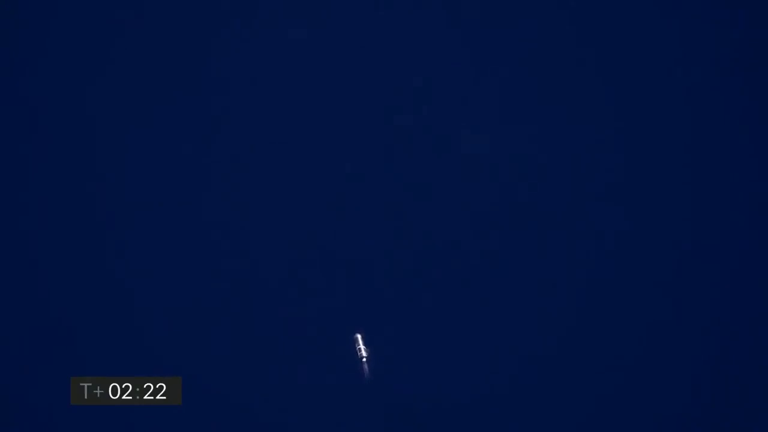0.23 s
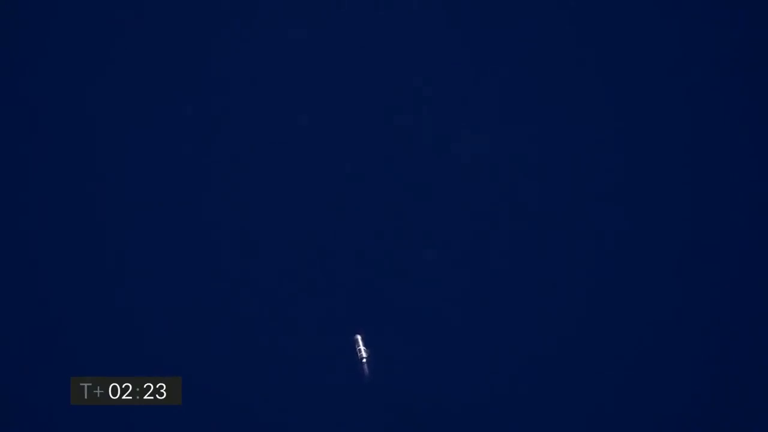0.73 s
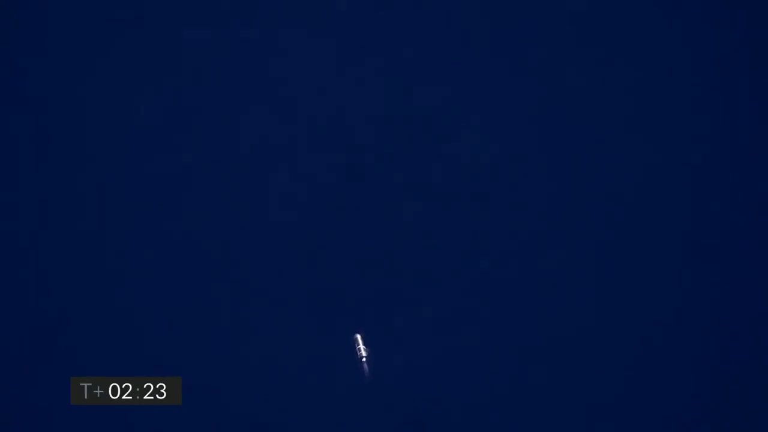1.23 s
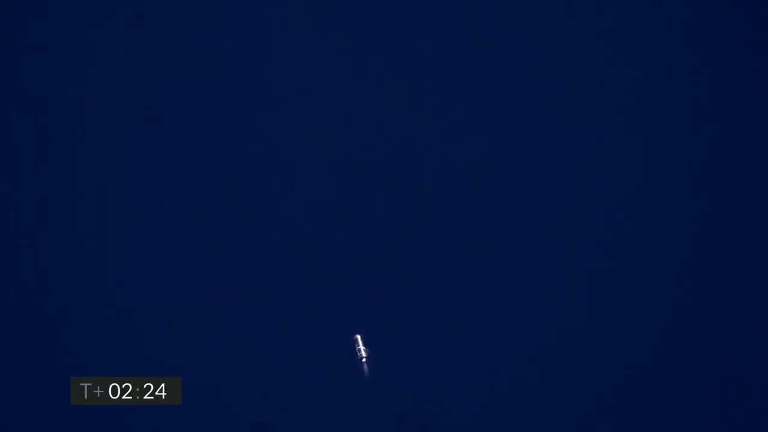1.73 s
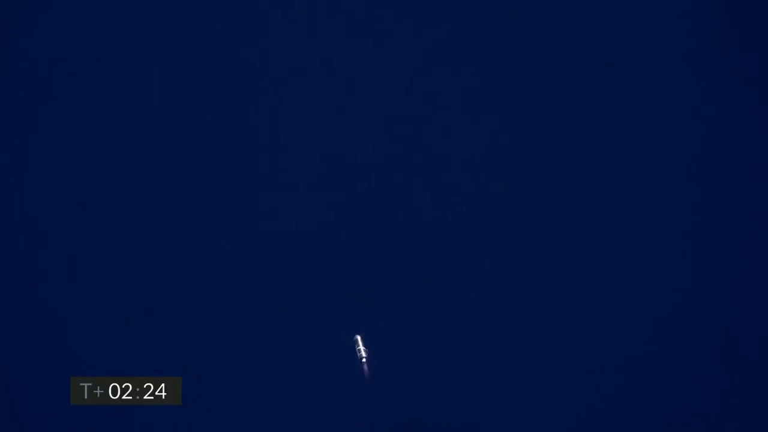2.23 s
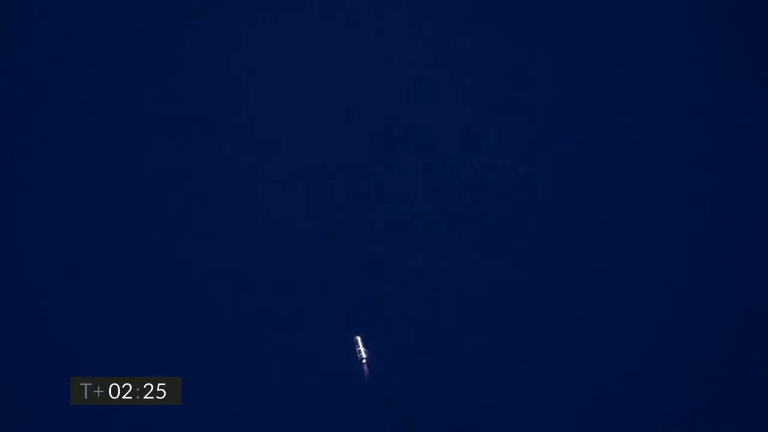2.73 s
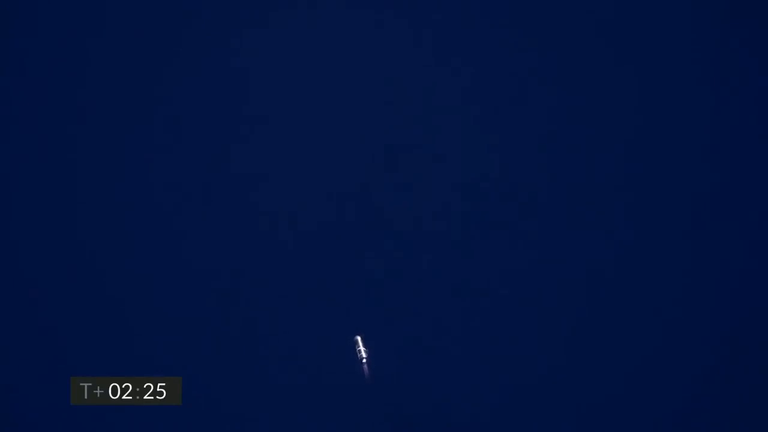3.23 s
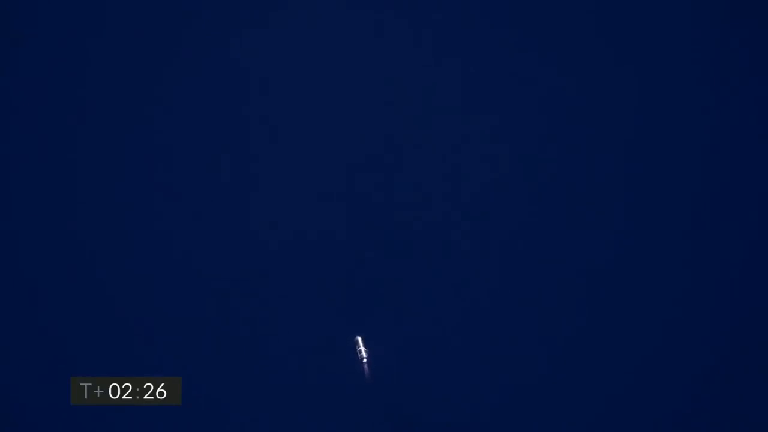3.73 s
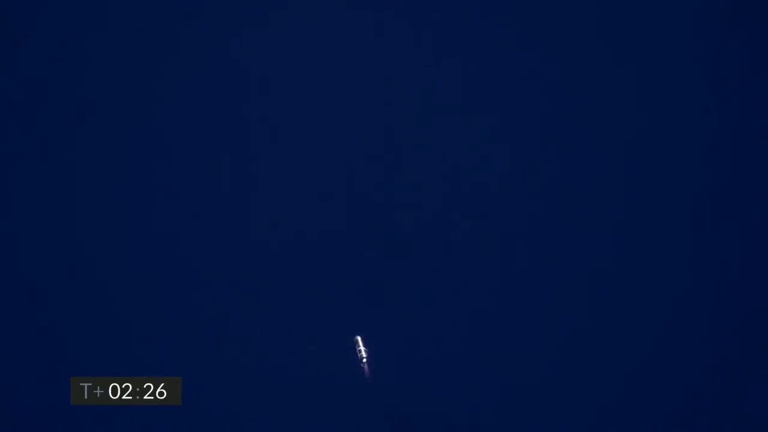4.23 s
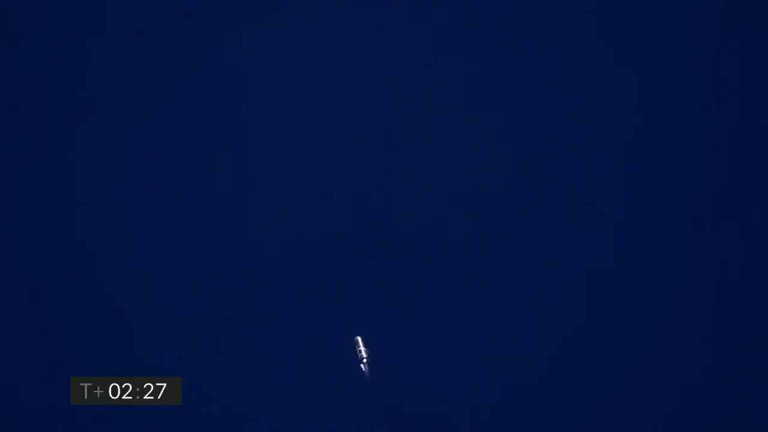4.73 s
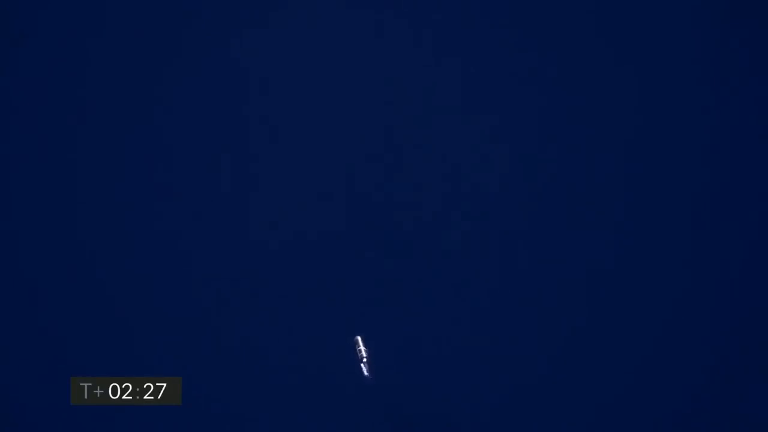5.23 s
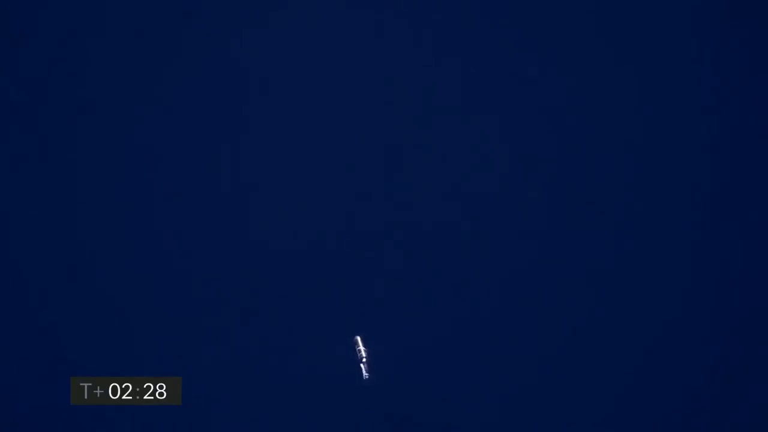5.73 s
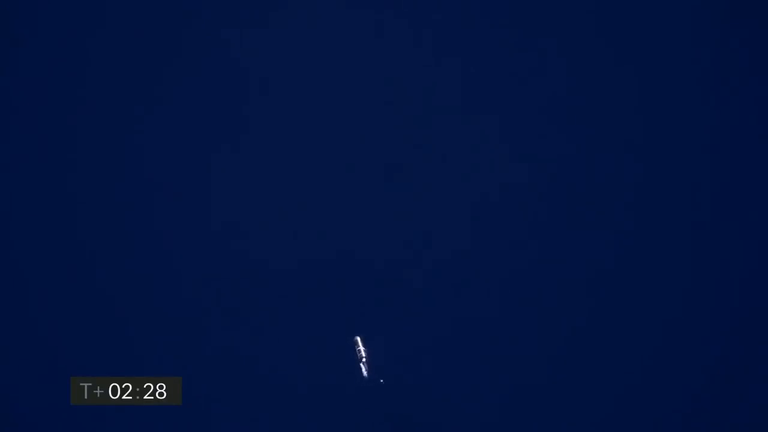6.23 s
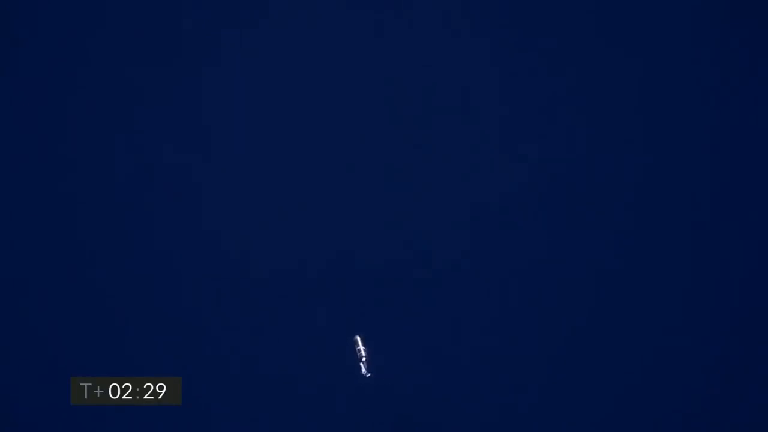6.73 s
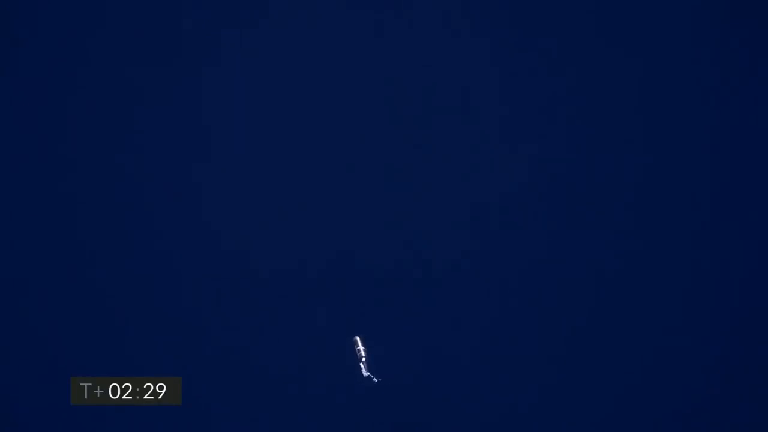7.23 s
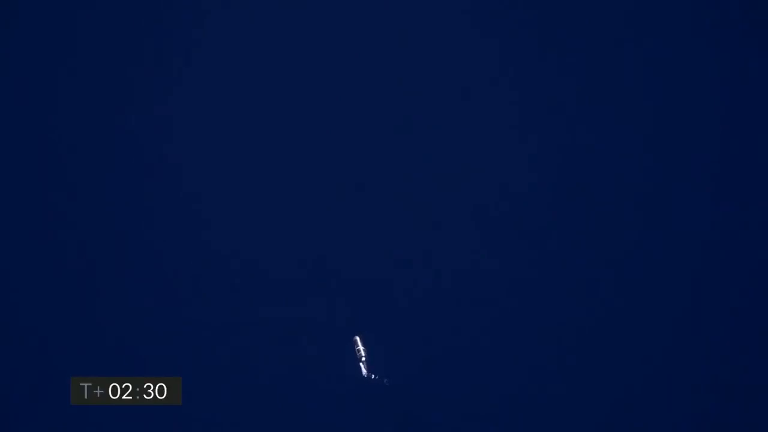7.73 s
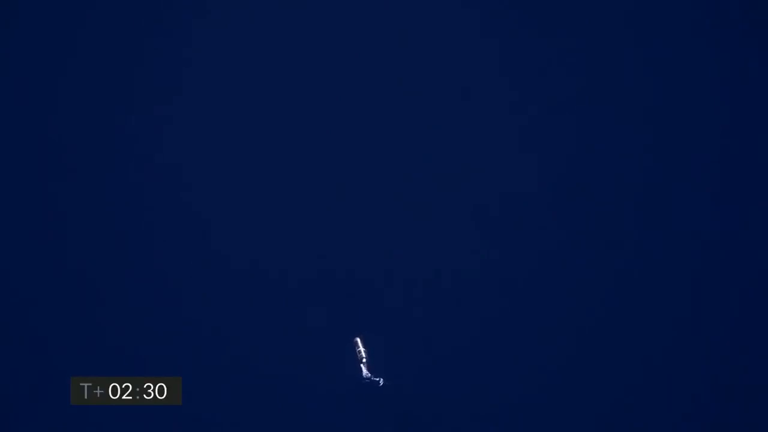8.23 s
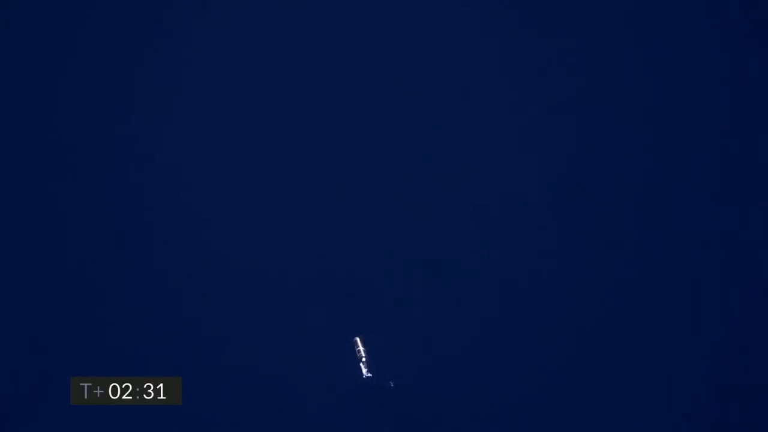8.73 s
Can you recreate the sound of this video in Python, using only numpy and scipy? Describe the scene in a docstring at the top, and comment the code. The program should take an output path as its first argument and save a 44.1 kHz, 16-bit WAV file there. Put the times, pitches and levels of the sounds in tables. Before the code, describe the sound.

A far-off rocket high overhead rumbles and crackles steadily, fading up early, while low wind gusts thump the microphone over a faint whining fan hiss.

```python
"""A rocket climbs high overhead: large eddies of its plume rumble and boom, synthesized as coloured noise.
Its shock fronts, random impulses dulled by miles of air, form a crackling roar with volleys and single cracks.
Resonant surroundings ring with these sounds. Gusts buffet the outdoor microphone as low noise with slow swings,
and a small fan close by adds faint sine tones and hiss. The whole sound is faded up early on."""
import sys
import numpy as np
from scipy import signal
from scipy.fft import rfft, irfft
from scipy.io import wavfile
from scipy.ndimage import uniform_filter1d

SR = 44100
rng = np.random.default_rng(int(sys.argv[2]) if len(sys.argv) > 2 else 0)


def wav_out(sig):
    """Save sig, one row per channel (or a flat mono array), as 16-bit PCM at SR to the path in sys.argv[1]."""
    wavfile.write(sys.argv[1], SR, np.round(np.clip(np.atleast_2d(sig).T, -1, 1) * 32767).astype(np.int16))


N = 396900  # length in samples

# All source levels are before the fader; spectra in dB per Hz give relative power density.

# Tones of the fan. Each row: frequency in Hz, level in dB relative to FAN_DB.
FAN_TONES = [(1718, -12.5), (1779, -1.5), (2625, -20.5), (2668, -18), (3368, -20.5), (3615, -19),
             (3680, -20), (3791, -12), (3850, -16), (4295, -21.5), (4330, -22), (4412, -19.5), (4435, -20),
             (4472, -17.5), (4525, -18.5), (4587, -20), (4646, -20), (4798, -19.5), (4857, -21),
             (5068, -21.5), (6874, -29.5)]
# Spectrum of the fan's moving air. Each row: frequency in Hz, density in dB per Hz.
HISS_SPECTRUM = [(200, 6), (1300, 2), (1850, 0), (1980, -3), (2150, 0.5), (3000, -6), (3500, -7),
                 (3800, -5.5), (4120, -10.5), (4550, -9.5), (5700, -13), (6650, -20.5), (7650, -21),
                 (8200, -30), (9200, -22), (9600, -21), (11000, -28), (15500, -36)]
# Course of the hiss. Each row: time in seconds, level in dB.
HISS_LEVELS = [(0.8, -53.5), (1.25, -54), (1.8, -54.5), (2.1, -54), (3.7, -54), (3.92, -52.5),
               (4.15, -54.5), (4.42, -53), (4.65, -53), (4.95, -54.5), (5.7, -54.5), (5.9, -53.3),
               (6.2, -54), (7.4, -54), (8.3, -54), (8.9, -54)]
FAN_DB = -63  # reference level of the tones
FINE_TONE_HZ, FINE_TONE_DB = 17, 1.5  # weaker tones in the hiss: spacing and typical lift

# Breeze on the microphone. Each row: time in seconds, level in dB.
BREEZE_LEVELS = [(0.3, -37), (1.8, -38), (2.6, -33.5), (3.7, -34.5), (5.0, -33.5), (6.15, -37.5),
                 (7.2, -34), (8.0, -30)]
# Gusts, each one heave of air. Each row: start in seconds, length in seconds, level in dB.
GUST_EVENTS = [(0.695, 0.13, -24), (1.048, 0.18, -25), (2.305, 0.27, -29), (2.598, 0.12, -20.5),
               (2.895, 0.19, -27.5), (4.69, 0.38, -32.5), (5.255, 0.13, -22.5), (5.374, .17, -14.5),
               (5.56, 0.13, -22), (5.843, 0.15, -26.5), (6.32, 0.18, -24.5), (8.06, 0.17, -26.5),
               (8.201, 0.16, -12), (8.34, .36, -20.5), (8.648, 0.18, -14.5), (8.842, .11, -13.5),
               (8.9, .2, -8.5)]
# Spectrum of the wind's flutter. Each row: frequency in Hz, density in dB per Hz.
FLUTTER_SPECTRUM = [(8, -41), (18, 6.5), (28, -6), (50, -11.5), (100, -22.5), (200, -32), (500, -54),
                    (8000, -150)]
GUST_ATTACK_S, GUST_RELEASE_S = 0.048, 0.074

# Resonances of the surroundings. Each row: centre in Hz, half width in Hz, lift at the start in dB,
# lift at the end in dB.
RESONANCES = [(58.6, 20.3, 21, 11), (98.1, 14.4, 21, 21), (151.1, 17.9, 16.5, 19.5),
              (184.46, 19.7, 18.5, 17.5), (231.5, 23, 6, 7.5), (309.7, 9.6, 10.5, 10.5),
              (354.4, 14.3, 12.5, 14.5), (401.3, 19, 10.5, 9), (449, 20, -2, 4.5), (485, 16.4, 11, 8.5),
              (534.4, 10.5, 11, 6.5), (586.4, 10, 5.5, 4), (635.4, 12, 5.5, 7), (721, 18, 7, 6.5),
              (746, 12, 10, 1), (784, 20, 4, 9.5), (850.2, 19, 13, 9), (904, 12, 1.5, 4), (962, 19, 4, 8),
              (1028, 24, 9.5, 7), (1136.6, 21, 10.5, 6.5), (1200, 12, 3, 1.5), (1280, 23, -2, 4),
              (1400, 20, 9, 9), (1670, 27, 4, 4)]
# Plume spectrum after the long path through air. Each row: frequency in Hz, density in dB per Hz.
FAR_AIR_SPECTRUM = [(30, -4.5), (130, -15), (300, -8.5), (500, -12), (650, -25), (900, -29.5), (1200, -37),
                    (1420, -46), (1700, -51), (2400, -59), (5000, -100)]

# Single steep shocks. Each row: start in seconds, peak in dB, edge (low-pass cutoff) in Hz;
# the steeper the front, the higher its edge.
CRACK_EVENTS = [(0.128, -13, 1100), (0.137, -19, 900), (0.181, -25, 1400), (0.187, -24, 1100),
                (0.233, -17, 900), (0.294, -21, 1210), (0.391, -13, 700), (0.401, -12, 800),
                (1.241, -12.5, 900), (1.262, -16.5, 398), (1.321, -17, 1300), (1.353, -15, 1000),
                (1.377, -18, 1300), (1.818, -18, 1180), (2.055, -21, 1200), (2.089, -28, 700),
                (2.158, -27, 900), (2.286, -19, 850), (2.36, -26, 597), (2.382, -26, 750),
                (2.462, -21, 1000), (2.507, -23, 800), (2.527, -13, 1000), (2.539, -22.5, 704),
                (2.726, -21.5, 1000), (2.953, -18.5, 600), (3.213, -18.5, 450), (3.353, -19, 700),
                (4.091, -19, 650), (4.425, -23, 656), (4.476, -18, 750), (5.341, -22.5, 700),
                (5.382, -15.5, 600), (5.729, -21, 700), (5.948, -16.5, 1590), (6.05, -18, 800),
                (6.075, -20, 700), (6.611, -26, 1700), (7.263, -19, 447), (7.449, -16, 550),
                (7.716, -19, 950), (8.030, -25, 950), (8.279, -15.5, 596), (8.341, -15.5, 1150),
                (8.505, -16.5, 500), (8.523, -18, 1400), (8.789, -17.5, 700)]
# Spectrum of a crack ahead of its edge filter. Each row: frequency in Hz, density in dB per Hz.
CRACK_SPECTRUM = [(30, -18), (120, 3), (400, 6.5), (650, -1.5), (1100, -6.5), (1850, -24.5), (2300, -25.5),
                  (5000, -50)]
# A crack comes mostly straight from the sky: share of the resonances' dB lift, length kept in seconds.
CRACK_RING_SHARE, CRACK_TAIL_S = 0.65, 0.1

# Volleys of strong shocks. Each row: start in seconds, length in seconds (before half a release is added),
# level in dB before VOLLEY_MAKEUP_DB and the shocks' colour.
VOLLEY_EVENTS = [(0.1, 0.035, -26.5), (0.162, .026, -29.5), (0.208, .025, -32), (0.269, 0.025, -26.5),
                 (0.367, 0.033, -33), (0.612, 0.019, -37), (0.686, 0.022, -36.5), (0.887, .022, -30),
                 (1.07, 0.017, -33.5), (1.222, 0.03, -31.5), (1.302, .026, -29.5), (1.338, 0.042, -31),
                 (1.785, .035, -36.5), (2.038, 0.033, -36.5), (2.28, 0.021, -40), (2.445, .025, -35),
                 (2.504, .04, -34), (2.715, 0.025, -38), (2.942, 0.026, -39), (3.05, 0.027, -39.5),
                 (3.317, .02, -37), (3.917, .028, -37), (4.452, .03, -37.5), (4.627, 0.019, -39),
                 (4.838, 0.027, -38.5), (5.286, 0.02, -37), (5.37, 0.025, -36), (5.503, 0.017, -43),
                 (5.92, .04, -38.5), (6.04, .04, -36.5), (6.585, 0.072, -38), (7.419, 0.036, -37.5),
                 (7.695, .03, -41), (7.967, .06, -38), (8.164, .014, -42), (8.255, .028, -44),
                 (8.317, .04, -28), (8.505, .03, -40), (8.563, 0.027, -39), (8.768, 0.019, -44)]
# Strong shocks stay steeper and keep more treble. Each row: frequency in Hz, density in dB per Hz.
SHOCK_SPECTRUM = [(30, -23), (150, -2.5), (500, 8), (700, 0.5), (1200, -6), (1850, -13), (2300, -27.5),
                  (5000, -59.5)]
VOLLEY_ATTACK_S, VOLLEY_RELEASE_S = 0.0086, 0.01403
VOLLEY_MAKEUP_DB = 34.5  # makes up for the loss through the shocks' colour

# Booms of single large eddies. Each row: start in seconds, length in seconds, level in dB, pitch in Hz.
BOOM_EVENTS = [(0.167, 0.11, -25.5, 62), (1.204, 0.11, -23.5, 161), (1.22, 0.15, -31, 65),
               (2.217, 0.59, -32.5, 188.6), (3.058, 0.086, -28, 95), (3.298, 0.12, -25.5, 64.6),
               (3.567, 0.15, -29, 186), (4.036, 0.11, -19.5, 95), (4.436, 0.1, -21.5, 96),
               (4.742, 0.063, -29.5, 345), (5.307, 0.15, -19.5, 60.4), (5.368, 0.086, -22, 143),
               (5.327, 0.25, -34, 247), (5.346, 0.22, -25, 101), (5.946, 0.086, -25, 97),
               (6.033, 0.13, -18.5, 98), (6.697, 0.082, -25, 100), (7.62, 0.073, -25, 183),
               (8.312, 0.064, -30.5, 161), (8.475, 0.35, -34.5, 342), (8.54, 0.062, -24, 154),
               (8.877, 0.23, -32, 110)]
BOOM_ATTACK_S, BOOM_RELEASE_S, BOOM_OCTAVES = 0.027, 0.058, 0.5  # last: bandwidth in octaves

# Slow swells of the plume. Each row: time in seconds, roar level in dB before ROAR_TRIM_DB,
# crackle level in dB; both before the flicker.
PLUME_LEVELS = [(0.05, -31, -48), (0.13, -30, -45), (0.25, -30.5, -43.5), (0.55, -30, -41),
                (0.8, -30.5, -42.5), (1.0, -28.5, -40), (1.13, -32, -44.5), (1.22, -31.5, -40),
                (1.38, -31.5, -43), (1.47, -31, -44.5), (1.75, -32, -43), (1.95, -35, -43.5),
                (2.07, -30.5, -43.5), (2.22, -34.5, -44), (2.5, -31.5, -43), (2.85, -32, -48),
                (3.2, -33.5, -47.5), (3.35, -29.5, -47.5), (3.5, -32.5, -51.5), (3.65, -30.5, -47.5),
                (3.85, -32.5, -50), (4.2, -31.5, -45.5), (4.33, -32.5, -48), (4.45, -29.5, -47.5),
                (4.6, -36, -52.5), (4.8, -31.5, -47.5), (5.08, -35.5, -48.5), (5.4, -31, -46),
                (5.8, -35, -46), (6.03, -32.5, -46.5), (6.25, -35, -50), (6.6, -32.5, -46.5),
                (7.15, -33.5, -52), (7.5, -30.5, -46), (7.85, -33.5, -48), (8.0, -31, -49.5),
                (8.15, -32, -47), (8.6, -32, -46.5), (8.87, -34.5, -46.5), (8.98, -28.5, -48.5)]
# Slow swells of the rumble under the roar. Each row: time in seconds, level in dB before the flicker.
RUMBLE_LEVELS = [(0.2, -27), (0.6, -33), (1.0, -31.5), (1.5, -32), (1.95, -33.5), (2.3, -32), (2.9, -33.5),
                 (3.8, -32), (4.42, -34.5), (4.7, -34), (5.1, -34.5), (5.45, -33), (5.8, -34.5),
                 (6.05, -32.5), (6.25, -37.5), (6.5, -32.5), (6.9, -34.5), (7.15, -36), (7.45, -33.5),
                 (8.0, -31.5), (8.25, -34), (8.6, -33.5)]
DEEP_DB, BOOM_BAND_DB = -32, -32  # the two lowest bands hold a steady level
ROAR_TRIM_DB = -1.0
# Turbulent air makes the sound flicker: random levels per second, rms depths in dB.
FLICKER_PER_S, ROAR_FLICKER_DB, CRACKLE_FLICKER_DB = 28, 0.78, 1.35

# Fader that brings the whole sound up. Each row: time in seconds, gain in dB.
FADER_GAINS = [(0.85, -8.5), (1.4, -2), (1.9, 0.1), (2.4, 1.5)]
TOP_HZ = 15700  # upper edge of the output


def undb(db):
    """Amplitude gain is ten to the power of the decibels over twenty."""
    return 10 ** (np.asarray(db) / 20)


def unit(x):
    """Normalization divides a signal by its rms."""
    return x / np.sqrt(np.mean(x ** 2))


def curves(table):
    """Linear interpolation carries each column after the time to every sample."""
    seconds, *columns = np.transpose(table)
    return [np.interp(np.arange(N) / SR, seconds, column) for column in columns]


def bins():
    """Frequencies in Hz of a full-length spectrum, kept at 1 Hz or more."""
    return np.maximum(np.arange(N // 2 + 1) * SR / N, 1)


def slope(points):
    """A spectrum in dB is interpolated over logarithmic frequency."""
    hz, db = np.transpose(points)
    return np.interp(np.log(bins()), np.log(hz), db)


def colour(x, db):
    """Minimum phase: folding the cepstrum makes the filter causal, so resonances ring on afterwards."""
    cepstrum = irfft(np.log(undb(db)), N)
    cepstrum[1:N // 2] *= 2
    cepstrum[N // 2 + 1:] = 0
    response = np.exp(rfft(cepstrum))
    return irfft(rfft(x) * response, N)


def band(x, low_hz, high_hz, order=8):
    """Butterworth magnitudes confine a sound to a band without shifting its phase."""
    f = bins()
    low_side = 1 + (low_hz / f) ** (2 * order)
    high_side = 1 + (f / high_hz) ** (2 * order)
    return irfft(rfft(x) / np.sqrt(low_side * high_side), N)


def walk(rate):
    """Random fluctuation: levels held 1 / rate seconds, smoothed by two moving averages to an rms of one."""
    hold = int(SR / rate)
    held = np.repeat(rng.standard_normal(N // hold + 1), hold)
    smoothed = uniform_filter1d(uniform_filter1d(held, hold), hold)
    return unit(smoothed[:N])


def steady(x, seconds):
    """Dividing by a running rms evens out slow swings and keeps the quick grain."""
    power = uniform_filter1d(x ** 2, int(seconds * SR))
    return x / np.sqrt(power + 1e-18)


def swell(t, length_s, attack_s, release_s):
    """A linear envelope rises from t = 0, holds and dies away."""
    rise = t / attack_s
    fall = (length_s - t) / release_s
    return np.clip(np.minimum(rise, fall), 0, 1)


def fan():
    """Rotation: tones waver together with the motor's speed and flicker singly, over the hiss of moving air."""
    turning = np.cumsum(1 + 0.0003 * walk(rate=9)) / SR
    whine = np.zeros(N)
    for hz, db in FAN_TONES:
        level = undb(db + 1.0 * walk(rate=4))
        phase = 2 * np.pi * (hz * turning + rng.random())
        whine += level * np.sqrt(2) * np.sin(phase)

    # random narrow peaks make the hiss ring faintly
    peaks = rng.exponential(size=SR // 8)
    fine = np.interp(bins() / FINE_TONE_HZ, np.arange(SR // 8), peaks)
    hiss_db, = curves(HISS_LEVELS)
    spectrum = slope(HISS_SPECTRUM) + FINE_TONE_DB * np.minimum(fine, 4)
    air = unit(colour(rng.standard_normal(N), spectrum))
    return whine * undb(FAN_DB) + air * undb(hiss_db + 0.55 * walk(rate=47))


def wind():
    """Wind pressure: breeze and gusts flutter on the microphone along with slow, heavy swings."""
    breeze_db, = curves(BREEZE_LEVELS)
    t = np.arange(N) / SR
    gusts = np.zeros(N)
    for start_s, length_s, db in GUST_EVENTS:
        gusts += undb(db) * swell(t - start_s, length_s, GUST_ATTACK_S, GUST_RELEASE_S)
    force = np.hypot(undb(breeze_db), gusts)
    flutter = steady(colour(rng.standard_normal(N), slope(FLUTTER_SPECTRUM)), seconds=0.072)
    swings = steady(band(rng.standard_normal(N), low_hz=2.0, high_hz=8.6, order=3), seconds=0.21)
    # the swings grow more slowly with the force than the flutter does
    return flutter * force + swings * undb(-4.0) * force ** 0.52


def surroundings():
    """Resonance: Gaussian peaks add up in dB to one lift curve for the start and one for the end."""
    f = bins()
    shapes = np.array([np.exp(-((f - hz) / width) ** 2) for hz, width, _, _ in RESONANCES])
    lifts = np.array(RESONANCES)[:, 2:]
    return lifts.T @ shapes


def resound(x, points, rings):
    """Reverberant colouring: resonances shift in strength, by a crossfade, as the rocket moves on."""
    early, late = (colour(x, slope(points) + lift) for lift in rings)
    return early + (late - early) * np.arange(N) / N


def shocks(rate, spread_db):
    """Random arrivals: shock fronts at rate per second, many weak and a few strong."""
    arrives = rng.random(N) < rate / SR
    strength_db = spread_db * np.minimum(rng.standard_normal(N), 2)
    train = arrives * undb(strength_db)
    return unit(train - train.mean())


def cracks(rings):
    """Impulse response: each lone steep shock is a brief snap with a faint ring after it."""
    spectrum = slope(CRACK_SPECTRUM) + CRACK_RING_SHARE * rings
    front = colour(signal.unit_impulse(N), spectrum)[:int(CRACK_TAIL_S * SR)]
    out = np.zeros(N + len(front))
    for start_s, db, edge_hz in CRACK_EVENTS:
        edge = signal.butter(2, edge_hz, fs=SR, output="sos")
        snap = signal.sosfilt(edge, front)
        start = int(start_s * SR)
        # inverted polarity
        out[start:start + len(snap)] -= undb(db) * snap / np.abs(snap).max()
    return out[:N]


def volleys(rings, count=36):
    """Superposition: each volley is a dense tumble of uneven shocks that swells and dies away."""
    train = np.zeros(N)
    for start_s, length_s, db in VOLLEY_EVENTS:
        whole_s = length_s + VOLLEY_RELEASE_S / 2
        lag = (np.arange(count) + rng.random(count)) / count * whole_s
        envelope = swell(lag, whole_s, VOLLEY_ATTACK_S, VOLLEY_RELEASE_S)
        strength = rng.standard_normal(count) * envelope
        arrival = ((start_s + lag) * SR).astype(int)
        np.add.at(train, arrival, undb(db) * strength / np.linalg.norm(strength))
    return undb(VOLLEY_MAKEUP_DB) * resound(train, SHOCK_SPECTRUM, rings)


def booms(eddies):
    """Eddy scale: now and then one large eddy swells out as a narrow band; larger ones sound lower."""
    out = np.zeros(N)
    edge = 2 ** (BOOM_OCTAVES / 2)
    for start_s, length_s, db, hz in BOOM_EVENTS:
        span = np.arange(int(start_s * SR), min(int((start_s + length_s) * SR), N))
        passband = signal.butter(3, [hz / edge, hz * edge], "band", fs=SR, output="sos")
        # start early so that the filter has settled
        lead_in = max(span[0] - SR // 4, 0)
        eddy = signal.sosfilt(passband, eddies[lead_in:span[-1] + 1])[-len(span):]
        envelope = swell(span / SR - start_s, length_s, BOOM_ATTACK_S, BOOM_RELEASE_S)
        out[span] += unit(eddy) * undb(db) * envelope
    return out


def plume(rings):
    """Jet noise: turbulence and dense shocks ring the surroundings; shocks dominate the higher bands."""
    roar_db, crackle_db = curves(PLUME_LEVELS)
    rumble_db, = curves(RUMBLE_LEVELS)
    flicker = walk(rate=FLICKER_PER_S)
    eddies = resound(rng.standard_normal(N), FAR_AIR_SPECTRUM, rings)
    uneven_shocks = shocks(rate=1100, spread_db=4) * undb(walk(rate=60))
    fronts = resound(uneven_shocks, FAR_AIR_SPECTRUM, rings)

    deep = steady(band(eddies, low_hz=41, high_hz=69), seconds=0.29)
    boom = steady(band(eddies, low_hz=88, high_hz=121.0), seconds=0.19)
    rumble_mix = eddies + undb(-5.5) * fronts
    rumble = steady(band(rumble_mix, low_hz=118.0, high_hz=257), seconds=0.14)
    roar_mix = fronts + undb(-7.5) * eddies
    roar = steady(band(roar_mix, low_hz=253.0, high_hz=628), seconds=0.11)
    crackle = steady(band(fronts, low_hz=618, high_hz=5000), seconds=0.13)

    lowest = deep * undb(DEEP_DB) + boom * undb(BOOM_BAND_DB)
    middle = rumble * undb(rumble_db) + roar * undb(roar_db + ROAR_TRIM_DB)
    flickering_middle = middle * undb(ROAR_FLICKER_DB * flicker)
    return lowest + flickering_middle + crackle * undb(crackle_db + CRACKLE_FLICKER_DB * flicker)


def scene():
    """Superposition: the rocket, the wind and the fan add at one microphone."""
    rings = surroundings()
    mean_rings = rings.mean(axis=0)
    large_eddies = colour(rng.standard_normal(N), slope(FAR_AIR_SPECTRUM) + mean_rings)
    rocket = plume(rings) + booms(large_eddies) + volleys(rings) + cracks(mean_rings)
    return (rocket + wind() + fan())[None]


def record(dry):
    """Gain and saturation: the fader comes up, peaks near full scale are rounded off and the top is cut."""
    fader_db, = curves(FADER_GAINS)
    loud = dry * undb(fader_db)
    rounded = loud / (1 + loud ** 16) ** (1 / 16)
    top_cut = signal.ellip(8, 0.2, 70, TOP_HZ, fs=SR, output="sos")
    return signal.sosfilt(top_cut, rounded)


dry = scene()
out = record(dry)
wav_out(out)
```